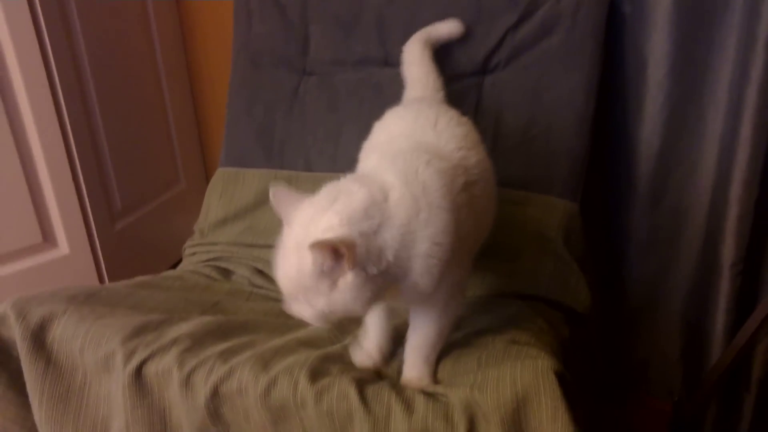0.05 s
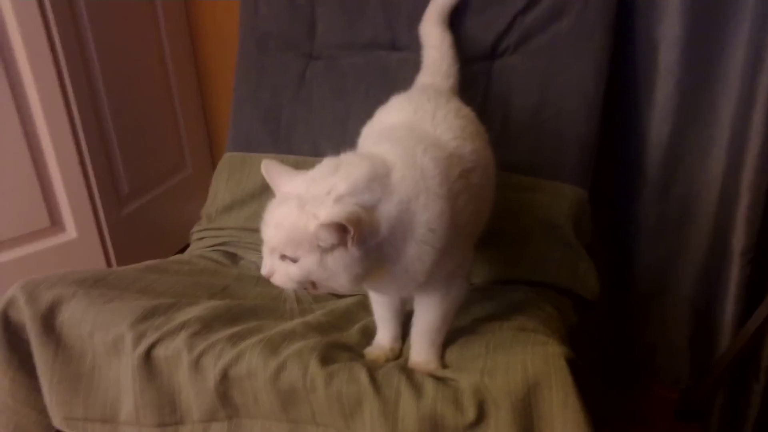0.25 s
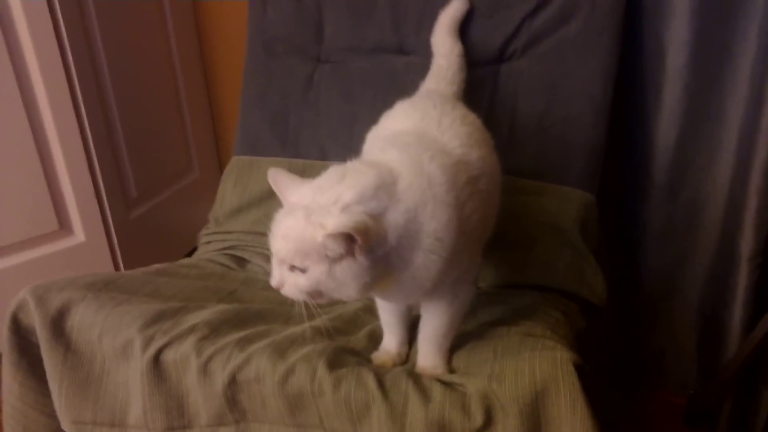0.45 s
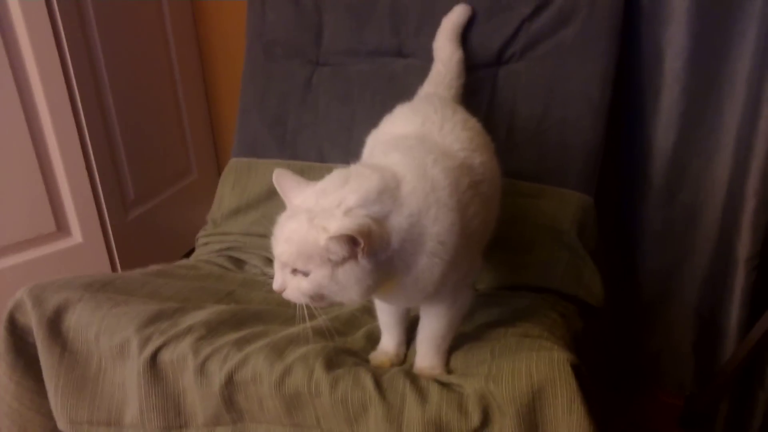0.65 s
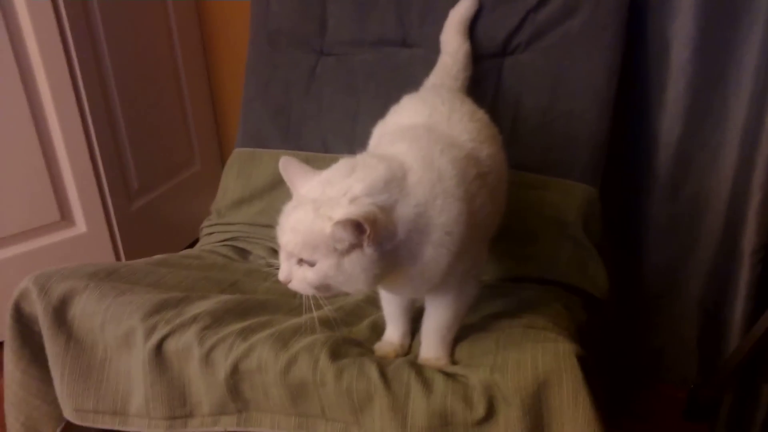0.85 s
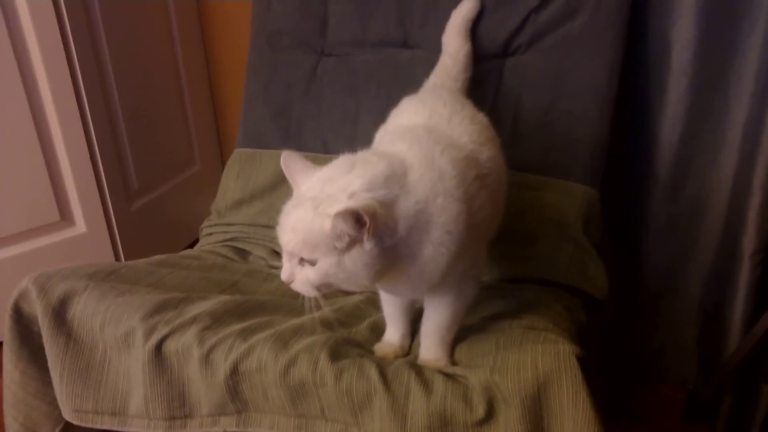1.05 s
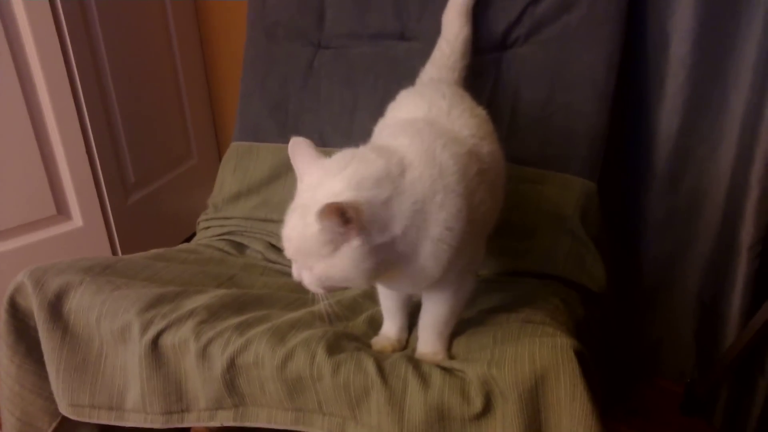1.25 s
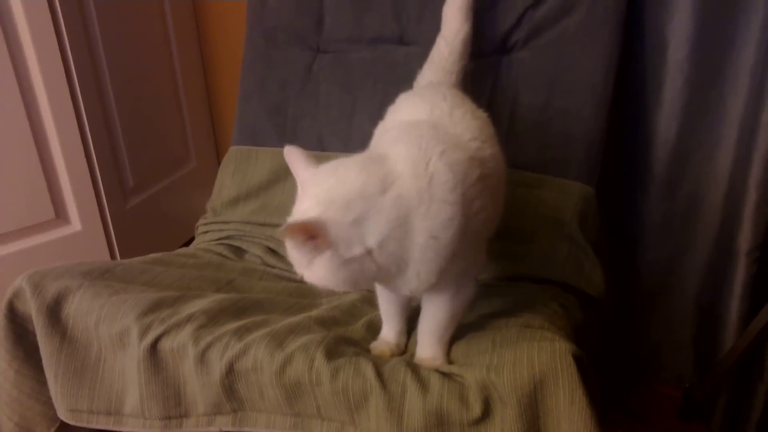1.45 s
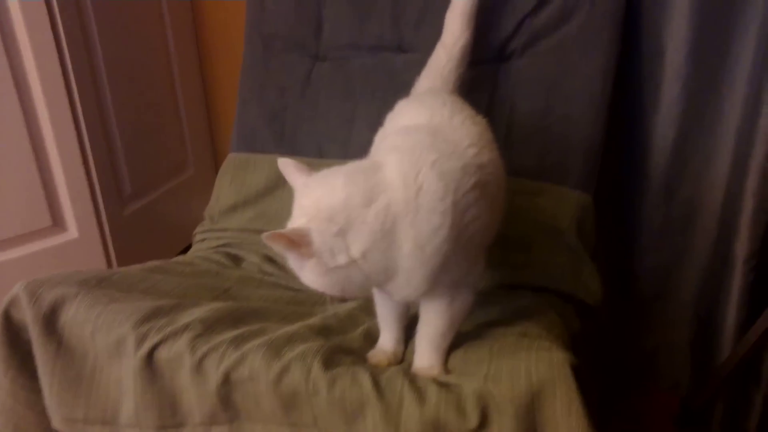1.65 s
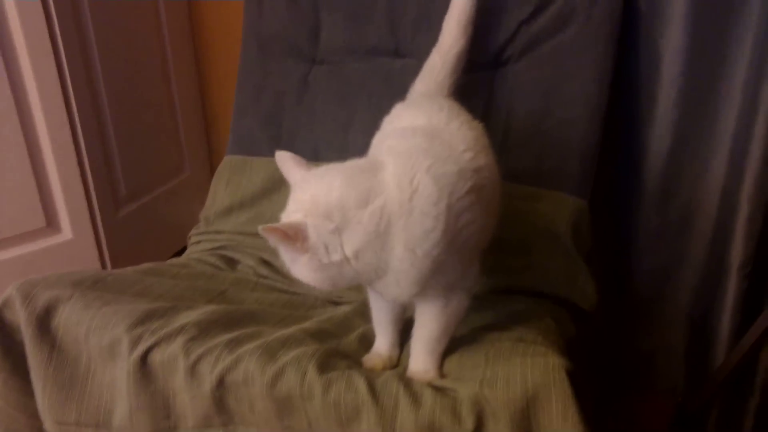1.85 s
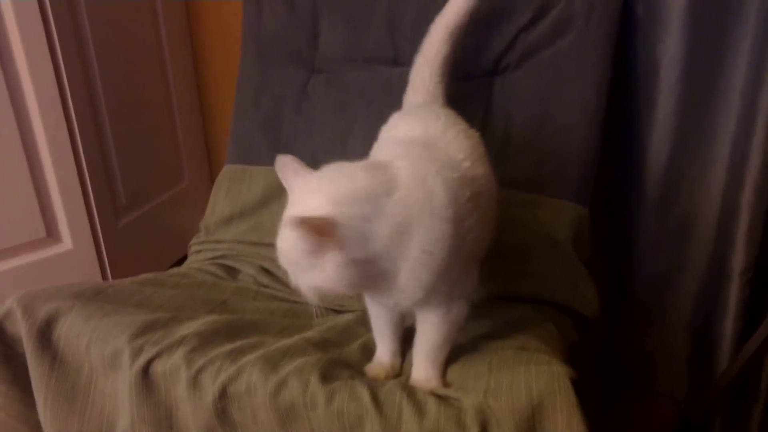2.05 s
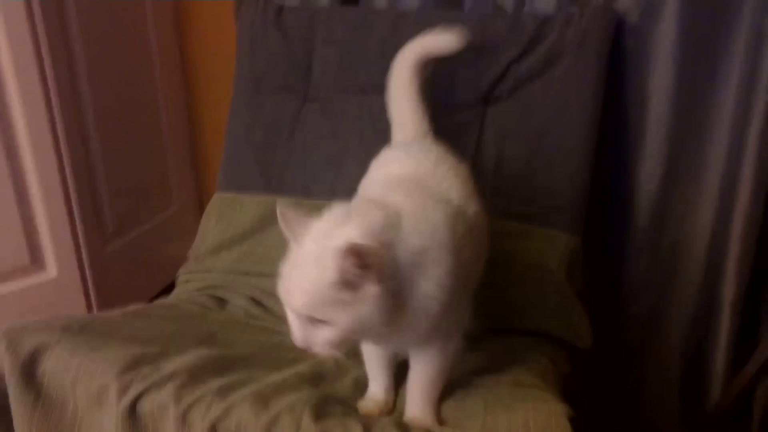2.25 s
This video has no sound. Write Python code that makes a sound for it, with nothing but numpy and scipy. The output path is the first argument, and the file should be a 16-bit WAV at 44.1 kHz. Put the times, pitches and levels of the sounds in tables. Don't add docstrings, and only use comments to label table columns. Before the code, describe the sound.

One very loud cat yowl in a furnished room, sharp and raspy in the middle with a falling, fraying end, slightly distorted by the close microphone; afterwards faint hiss, motor whine, tiny ticks and distant hoots.

```python
import sys
import numpy as np
from scipy import signal
from scipy.fft import rfft, irfft
from scipy.io import wavfile
from scipy.ndimage import uniform_filter1d

SR = 44100
rng = np.random.default_rng(int(sys.argv[2]) if len(sys.argv) > 2 else 0)


def transcribe(signal):
    frames = np.atleast_2d(signal).T
    limited = np.clip(frames, -1, 1)
    pcm = np.round(limited * 32767).astype(np.int16)
    wavfile.write(sys.argv[1], SR, pcm)


def level_to_linear(level):
    exponent = np.asarray(level, float) / 20
    return 10 ** exponent


N = 101429

# [t/s, level/dB]
RISE_EFFORT = [
    (0.11, -51.5),
    (0.164, -45),
    (0.208, -25.5),
    (0.305, -8.5),
]
# [t/s, level/dB, ring against buzz/dB]
YOWL_EFFORT = [
    (.305, -10.5, -4),
    (.32, -7.5, -7),
    (.36, -7.5, -5.5),
    (.42, -6.5, -4),
    (.46, -7, -5.5),
    (.505, -10.5, -9),
    (.54, -12, 4),
    (.6, -14.5, 0),
    (.668, -14, 2.5),
]
# [t/s, level/dB]
FALL_EFFORT = [
    (0.668, -15.5),
    (0.696, -14),
    (0.72, -18),
    (0.728, -10),
    (0.78, -21.5),
    (0.812, -15.5),
    (0.828, -22),
    (0.986, -28.5),
    (1.06, -47.5),
]
# [t/s, f/Hz]
RISE_PITCH = [(.11, 470), (.135, 415), (.16, 435), (.18, 478), (.2, 517), (.22, 550), (.24, 598),
              (.28, 672), (.305, 728)]
# [t/s, f/Hz]
YOWL_FOLD_RATE = [(.305, 830), (.39, 968), (.445, 960), (.47, 860), (.52, 805), (.56, 765), (.668, 752)]
# [t/s, f/Hz]
FALL_PITCH = [(.668, 663), (.715, 659), (.74, 640), (.8, 616), (.89, 573), (.92, 565), (.985, 524),
              (1.01, 478), (1.06, 415)]
# [t/s, f/Hz]
RING_PITCH = [(.305, 2130), (.355, 2120), (.37, 1960), (.445, 1925), (.456, 1745), (.49, 1700), (.52, 1605),
              (.555, 1525), (.668, 1508)]
# [multiple of the first resonance, level/dB]
RING_PARTIALS = [(1, 0), (2, -21), (3, -20.5)]
# [t/s, first resonance f/Hz, second resonance f/Hz, second level/dB, upper level/dB]
MOUTH_SHAPE = [(.11, 930, 2300, -7.5, -37), (.2, 1500, 2870, -16.5, -8), (.3, 2320, 4240, -6.5, -14.5),
               (.43, 1827, 3700, -5, -15), (.52, 1526, 3280, -13.5, -15.5), (.66, 1630, 3600, -17, -6),
               (.68, 1300, 3065, 13, -13), (.85, 1276, 2980, 13.5, -5.5), (1.03, 1050, 3200, -8.5, -16.5)]
# [f/Hz, width/Hz, level/dB]
RISE_THROAT = [(470, 150, 8), (2690, 900, 8.5), (3700, 500, 5), (5360, 600, -3.5), (7500, 510, -13.5)]
# [f/Hz, width/Hz, level/dB]
YOWL_THROAT = [(2853, 1800, 3.5), (4650, 790, -2), (5517, 700, -1.5), (7300, 920, -9), (8650, 850, -8)]
# [f/Hz, width/Hz, level/dB]
FALL_THROAT = [(450, 250, 5), (1712, 1400, 12), (2600, 590, 4.5), (4460, 410, -4), (5225, 600, 1),
               (7334, 1600, -13.5), (8520, 900, -9.5)]
# [f/Hz, level/dB]
RISE_COLOUR = [(300, -11), (650, -19), (1000, 0.5), (2000, -4), (5600, 2), (6600, -6), (9000, -19.5),
               (13000, -48.5)]
# [f/Hz, level/dB]
YOWL_COLOUR = [(300, -43.5), (600, -14.5), (1000, -4.5), (2000, 0.5), (6300, 6), (9000, -5), (10000, -11),
               (16000, -44)]
# [f/Hz, level/dB]
FALL_COLOUR = [(300, -16), (650, -17.5), (1000, -1), (2000, -5.5), (5800, 5.5), (6600, 5), (9300, 0),
               (13000, 6.5)]
# [f/Hz, time to fall 60 dB/s]
ROOM_DECAY = [(300, .36), (1200, .36), (3000, 0.32), (6000, 0.39), (10000, 0.15)]
# [f/Hz, rms level/dB]
MOTOR_TONES = [(1125, -73), (1443, -76.5), (3488, -75.5), (3989, -77.5), (4113, -61), (4231, -76.5),
               (4484, -66), (4732, -78.5), (5728, -83.5), (5975, -70.5), (6164, -56), (6971, -89.5),
               (7224, -92), (7472, -85), (8220, -76.5), (9711, -79), (9959, -77.5), (10212, -79.5),
               (10277, -84), (11208, -78.5), (12333, -71.5), (14390, -78.5)]
# [f/Hz, level per Hz/dB]
HISS_COLOUR = [(35, -58), (60, -24), (248, -3.5), (2650, -16.5), (4030, -7.5), (4960, -6.5), (5980, -9),
               (15500, -29.5)]
# [f/Hz, width/Hz, level/dB]
CAMERA_BODY = [(250, 58.4, 1.5), (4404, 1240, -5), (5600, 1300, 1.5), (7000, 1100, -0.5), (10200, 900, 7.5)]
# [t/s, length/s, f/Hz, level/dB]
DISTANT_HOOTS = [
    (1.37, .11, 541, -65),
    (1.95, .08, 545, -64),
    (1.42, .05, 1440, -69),
]


def cat():
    return clear_rise() + harsh_buzz() + throat_ring() + clear_fall()


def clear_rise():
    t = np.arange(N) / SR
    breath = np.interp(t, [RISE_EFFORT[0][0], 0.19], [0.6, 0.11])
    return voice(RISE_PITCH, RISE_EFFORT, 0.005, breath, 1.7, RISE_THROAT, RISE_COLOUR)


def harsh_buzz():
    effort = np.array(YOWL_EFFORT)[:, :2]
    buzz = voice(YOWL_FOLD_RATE, effort, 0.08, 0.5, 1, YOWL_THROAT, YOWL_COLOUR)
    return level_to_linear(-3.5) * buzz


def throat_ring():
    t = np.arange(N) / SR
    s, db, ring_db = np.transpose(YOWL_EFFORT)
    lines = choking_line(YOWL_FOLD_RATE, 0.99, -25)
    for multiple, partial_db in RING_PARTIALS:
        lines = lines + choking_line(RING_PITCH, multiple, partial_db)
    lines = lines / np.sqrt(uniform_filter1d(lines ** 2, size=1800))
    return lines * level_to_linear(np.interp(t, s, db + ring_db)) * stretch_gate(t, s)


def clear_fall():
    t = np.arange(N) / SR
    breath = np.interp(t, [0.97, FALL_EFFORT[-1][0]], [0.015, 0.35])
    return voice(FALL_PITCH, FALL_EFFORT, 0.0016, breath, 0.33, FALL_THROAT, FALL_COLOUR)


def voice(pitch, effort, jitter, breath, throb_db, upper, colour):
    t = np.arange(N) / SR
    s, db = np.transpose(effort)
    rate_hz = np.interp(t, *np.transpose(pitch)) * (1 + jitter * drift(0.003))
    turns = np.cumsum(rate_hz) / SR
    folds = np.zeros(N)
    for k in range(1, 22):
        wander = level_to_linear(3 * drift(0.022))
        folds += wander * np.cos(2 * np.pi * k * turns + k * k / 7)
    puffs = (0.4 + np.exp(-(turns % 1) / 0.3)) * rng.standard_normal(N)
    sound = throat((1 - breath) * evened(folds) + breath * evened(puffs), upper, colour)
    sound = sound / np.sqrt(uniform_filter1d(sound ** 2, size=1000) + 1e-12)
    loudness = level_to_linear(np.interp(t, s, db) + throb_db * drift(0.0052))
    return sound * stretch_gate(t, s) * loudness


def throat(x, upper, colour):
    first_width_hz, second_width_hz = 260, 420
    hz, t, z = signal.stft(x, SR, nperseg=512, noverlap=448)
    hz, rows = hz[:, None], np.transpose(MOUTH_SHAPE)
    first, second, second_db, upper_db = (np.interp(t, rows[0], row) for row in rows[1:])
    power = bump(hz, first, first_width_hz) ** 2
    power = power + (level_to_linear(second_db) * bump(hz, second, second_width_hz) ** 2) ** 2
    for f, width, db in upper:
        power += (level_to_linear(upper_db + db) * bump(hz, f, width) ** 2) ** 2
    shaped = z * np.sqrt(power) * level_to_linear(read(colour, hz))
    return signal.istft(shaped, SR, nperseg=512, noverlap=448)[1][:N]


def choking_line(pitch, multiple, db):
    turns = np.cumsum(np.interp(np.arange(N) / SR, *np.transpose(pitch))) / SR
    swell_s = 0.0055
    swell = 0.4 + (drift(swell_s) + 1j * drift(swell_s)) / 2
    return level_to_linear(db) * np.sqrt(2) * (swell * np.exp(2j * np.pi * multiple * turns)).real


def stretch_gate(t, s):
    return np.clip(np.minimum(t - s[0], s[-1] - t) / 0.007 + 0.5, 0, 1)


def bedroom(x):
    taps = np.zeros(SR // 2)
    at = np.arange(100, len(taps) - 20, 20)
    taps[at + rng.integers(0, 20, len(at))] = rng.choice([-1., 1.], len(at))
    hz, t, z = signal.stft(taps, SR, nperseg=256)
    decay = level_to_linear(-60 * t / read(ROOM_DECAY, hz)[:, None])
    tail = signal.istft(z * decay, SR, nperseg=256)[1]
    return signal.fftconvolve(x, evened(tail) / np.sqrt(len(tail)))[:N]


def motor_whine():
    waver_hz, waver_db = 0.5, 0.5
    whine = np.zeros(N)
    for hz, db in MOTOR_TONES:
        level = np.sqrt(2) * level_to_linear(db + waver_db * drift(0.03))
        turns = np.cumsum(hz + waver_hz * hz / 5000 * drift(0.05)) / SR
        whine += level * np.sin(2 * np.pi * (turns + rng.random()))
    return whine


def hiss():
    hz = np.fft.rfftfreq(N, 1 / SR)
    shape_db = read(HISS_COLOUR, hz)
    for f, width, db in CAMERA_BODY:
        shape_db = shape_db + db * bump(hz, f, width) ** 2
    noise = irfft(rfft(rng.standard_normal(N)) * level_to_linear(shape_db), N)
    return level_to_linear(-57.5 + 0.588 * drift(0.05)) * evened(noise)


def ticks():
    ring_hz, t60_s, turns_per_s, first_s = 8650, 0.025, 13.15, 0.0045
    since = (np.arange(N) / SR - first_s) % (1 / turns_per_s)
    band = signal.butter(2, [ring_hz - 200, ring_hz + 200], "bandpass", fs=SR)
    metal = evened(signal.lfilter(*band, rng.standard_normal(N)))
    return level_to_linear(-70.5 - 60 * since / t60_s) * metal


def hoots():
    t = np.arange(N) / SR
    out = np.zeros(N)
    for s, length, hz, db in DISTANT_HOOTS:
        swell = np.sin(np.pi * np.clip((t - s) / length, 0, 1)) ** 0.7
        out += level_to_linear(db) * swell * np.sqrt(2) * np.sin(2 * np.pi * hz * t)
    return out


def evened(x):
    return x / np.sqrt(np.mean(x ** 2) + 1e-20)


def read(points, hz):
    f, value = np.transpose(points)
    return np.interp(np.log(hz + 1), np.log(f + 1), value)


def drift(length_s, size=N):
    n = max(round(length_s * SR), 2)
    return evened(uniform_filter1d(uniform_filter1d(rng.standard_normal(size), n), n))


def bump(hz, centre_hz, width_hz):
    return 1 / np.sqrt(1 + (2 * (hz - centre_hz) / width_hz) ** 2)


def scene():
    call = cat()
    near = level_to_linear(-2.5) * call + level_to_linear(-7) * bedroom(call)
    background = motor_whine() + hiss() + ticks() + hoots()
    return (near + background)[None]


def band_limit(x):
    return signal.sosfilt(signal.butter(12, 15740, fs=SR, output="sos"), x)


def record(dry):
    ceiling, knee, lean = 0.7, 9, 0.01
    lifted = dry + lean
    mix = lifted / (1 + abs(lifted / ceiling) ** knee) ** (1 / knee) - lean
    return band_limit(mix)


dry = scene()
out = record(dry)
transcribe(out)
```